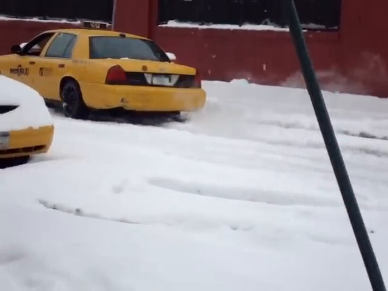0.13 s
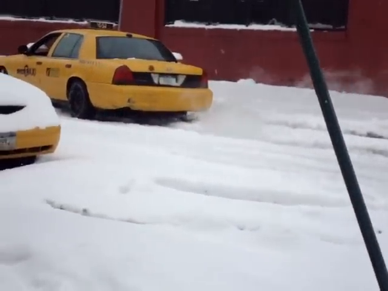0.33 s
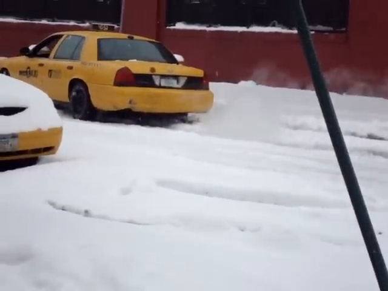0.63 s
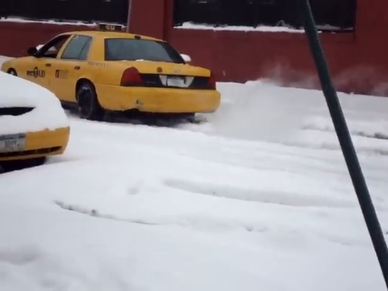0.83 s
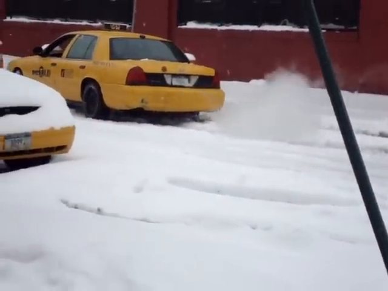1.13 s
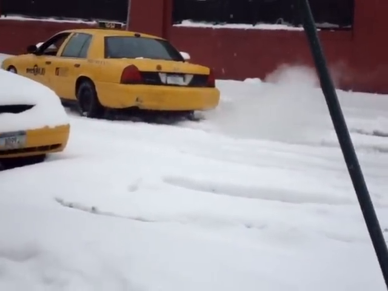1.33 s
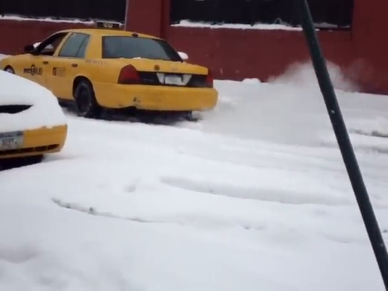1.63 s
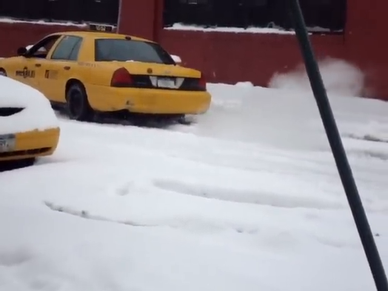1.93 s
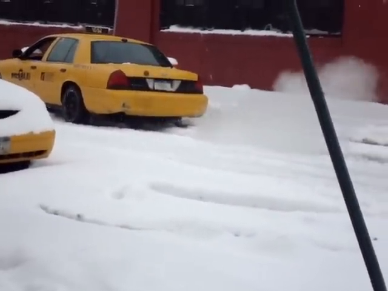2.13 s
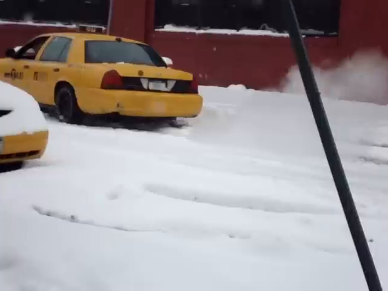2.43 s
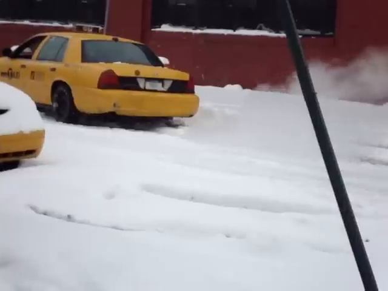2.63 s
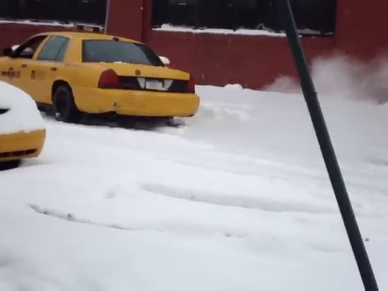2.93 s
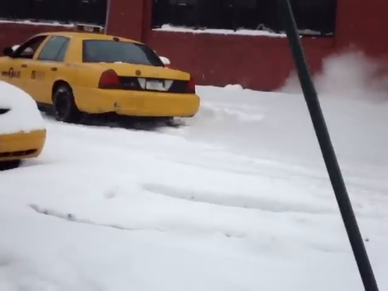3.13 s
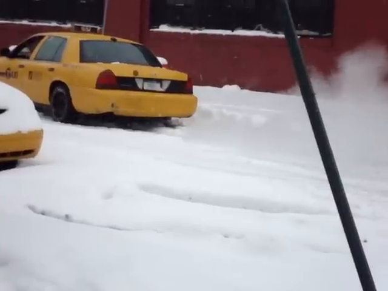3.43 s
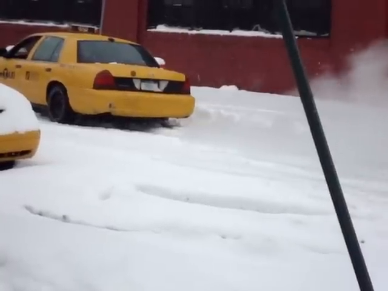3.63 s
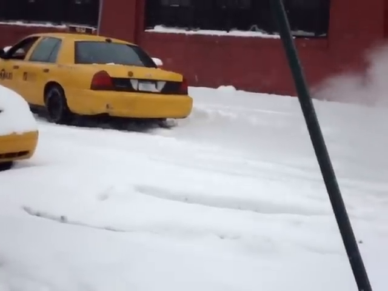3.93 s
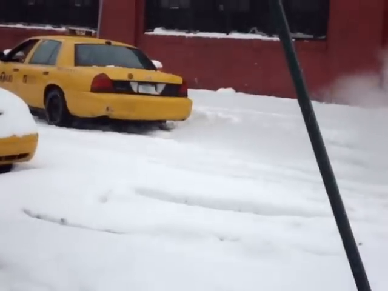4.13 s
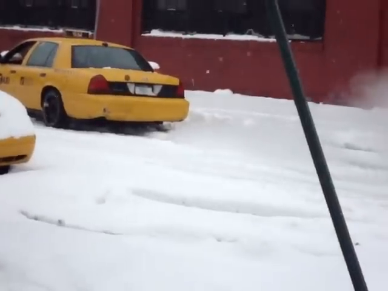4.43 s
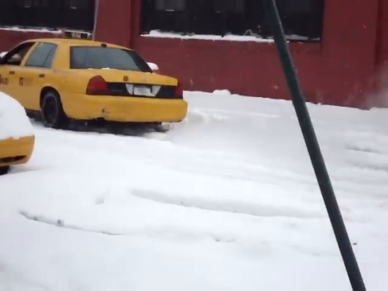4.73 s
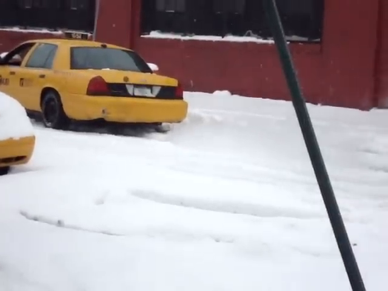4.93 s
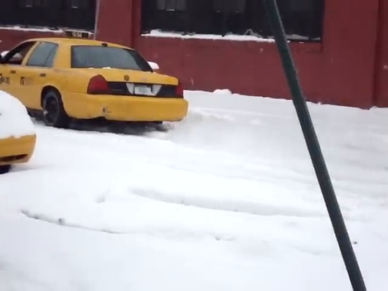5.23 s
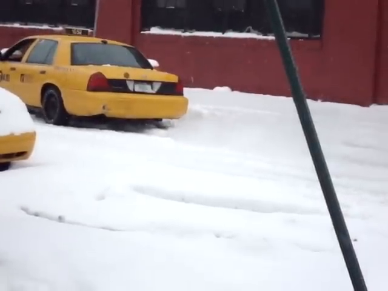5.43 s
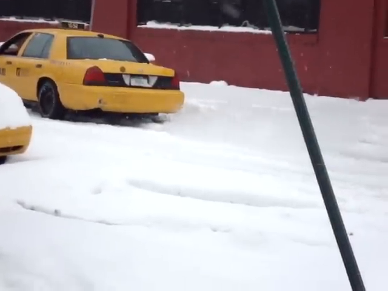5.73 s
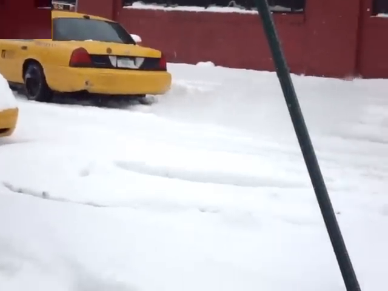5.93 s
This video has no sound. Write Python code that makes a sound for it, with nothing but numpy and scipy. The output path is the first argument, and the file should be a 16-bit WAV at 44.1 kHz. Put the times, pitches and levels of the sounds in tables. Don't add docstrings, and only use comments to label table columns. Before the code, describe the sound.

A car stuck in deep snow spins its rear wheels, tyres whining up and down in fuzzy tones as the engine revs, over muffled city traffic.

```python
import sys
import numpy as np
from scipy import signal
from scipy.fft import rfft, irfft, next_fast_len
from scipy.io import wavfile
from scipy.ndimage import uniform_filter1d, map_coordinates

SR = 44100
rng = np.random.default_rng(int(sys.argv[2]) if len(sys.argv) > 2 else 0)


def voltage_ratio(level):
    return 10 ** (np.asarray(level, float) / 20)


def store_wav(level_fs):
    pcm = np.round(np.clip(np.atleast_2d(level_fs), -1, 1) * 32767)
    wavfile.write(sys.argv[1], SR, pcm.T.astype(np.int16))


N = 267775

# time_s, firing_hz, throttle_db
ENGINE_RUN = [(0, 61, -75), (.13, 75, -46.5), (.62, 160, -36), (.72, 165, -37.5), (.82, 168, -44),
              (1.35, 121, -50), (1.55, 148, -38.5), (2.2, 238, -29), (2.3, 244, -36), (2.4, 225, -38.5),
              (2.8, 165, -37), (3.05, 140, -41.5), (3.55, 121, -45), (3.85, 168, -42), (4.8, 166, -37.5),
              (5.4, 105, -44), (5.76, 70, -51), (6.07, 108, -38.5)]
# time_s, slow_tread_hz, slow_bite_db, fast_tread_hz, fast_bite_db
WHEEL_SLIP = [(.25, 710.2, -53, 1330, -65), (.55, 913, -34.5, 1700, -38), (.83, 1078, -28.5, 2050, -29.5),
              (1.37, 729.4, -40, 1220, -43), (1.6, 828.5, -35, 1400, -37.5), (2.3, 1299, -26, 2200, -25.5),
              (2.47, 1099, -28, 1950, -27.5), (2.95, 890.3, -31, 1530, -34.5), (3.45, 754, -36, 1400, -33),
              (3.8, 836.6, -29.5, 1490, -30.5), (4.1, 1011, -24, 1750, -26), (4.5, 1141, -23, 1950, -29),
              (4.95, 1040, -22.5, 1560, -27), (5.22, 716.3, -26, 1400, -33),
              (5.42, 603.3, -30.5, 1370, -46.5), (5.7, 600, -48, 1250, -58), (5.9, 755, -42, 1300, -54),
              (6.07, 946, -27.5, 1500, -45)]


def unit(x):
    return x / np.sqrt(np.mean(np.abs(x) ** 2) + 1e-20)


def curves(rows):
    times_s, *columns = np.transpose(rows)
    return [np.interp(np.arange(N) / SR, times_s, column) for column in columns]


def wobble(rate):
    knots = rng.standard_normal(int(N * rate / SR) + 4)
    return map_coordinates(knots, [np.arange(N) * rate / SR])


def coloured(x, points):
    size = next_fast_len(N + 8192)
    hz, db = np.transpose(points)
    log_hz = np.log(np.fft.rfftfreq(size, 1 / SR) + 1)
    gain = voltage_ratio(np.interp(log_hz, np.log(hz + 1), db))
    return irfft(rfft(x, size) * gain, size)[:N]


def rush(spectrum, patchy_db, size=12):
    noise = signal.stft(rng.standard_normal(N), nperseg=512)[2]
    patches = uniform_filter1d(rng.standard_normal(noise.shape), size=8, axis=0)
    patches = uniform_filter1d(patches, size=size, axis=1)
    patchy = signal.istft(noise * voltage_ratio(patchy_db * unit(patches)), nperseg=512)[1][:N]
    return unit(coloured(patchy, spectrum))


def turns(hz):
    return 2 * np.pi * np.cumsum(hz) / SR


def fuzzy(hz, width_hz, steady=0):
    pole = np.exp(-2 * np.pi * width_hz / SR)
    kicks = rng.standard_normal(N) + 1j * rng.standard_normal(N)
    drift = signal.lfilter([1], [1, -2 * pole, pole ** 2], kicks)
    carrier = np.exp(1j * turns(hz))
    return unit(np.real(drift / np.abs(drift) ** steady * carrier))


def swell(start_s, length_s):
    progress = np.clip((np.arange(N) / SR - start_s) / length_s, 0, 1)
    return np.sin(np.pi * progress) ** .6


def city():
    # pitch_hz, level_db (per Hz)
    hum = [(15, -61), (25, -29), (70, -12), (124, -12.5), (172, -4.5), (290, 0), (382, -2.5), (663, 2.5),
           (941, -1), (1300, -6), (1440, -6), (3200, -14.5), (5290, -26.5), (8500, -30.5), (9880, -30.5),
           (12800, -58), (21700, -120)]
    return voltage_ratio(-36 + 0.63 * wobble(1.8)) * rush(hum, patchy_db=0.7)


def drones():
    # start_s, length_s, pitch_hz, level_db, width_hz
    resonances = [(.3, .45, 172, -55, 6), (2.3, .8, 170, -55, 6), (3.72, .3, 170, -52, 5),
                  (4.1, .9, 158, -59, 9), (3.05, .45, 79, -55, 2), (1.9, 1.15, 298, -54, 8),
                  (4.1, 1.1, 322, -55, 6), (4.2, 1.65, 2920, -48.5, 70), (5.2, .35, 930, -34, 110),
                  (4.3, .75, 1062, -31, 30), (4.4, .55, 1775, -36, 40)]
    out = np.zeros(N)
    for start_s, length_s, hz, db, width_hz in resonances:
        out += voltage_ratio(db) * swell(start_s, length_s) * fuzzy(np.full(N, hz), width_hz, steady=.5)
    return out


def squeaks():
    # start_s, pitch_hz, level_db
    rubs = [(4.015, 6750, -46), (4.15, 7320, -51), (4.24, 7680, -48), (4.37, 8000, -49),
            (4.45, 8060, -46.5), (4.57, 8020, -48), (4.775, 7980, -49.5), (4.865, 7690, -50.5)]
    wheel_hz = curves(WHEEL_SLIP)[0]
    out = np.zeros(N)
    for start_s, hz, db in rubs:
        glide = wheel_hz / wheel_hz[round(start_s * SR)]
        squeak = fuzzy(hz * glide, width_hz=140, steady=.7)
        out += voltage_ratio(db + 1.5) * swell(start_s, length_s=.052) * squeak
    return out


def engine():
    # pitch_hz, level_db (per Hz)
    pipe = [(300, -19.5), (650, 7.5), (1000, 7), (2000, 1), (2700, 1.5), (3500, -3.5), (4300, -0.5),
            (5000, 0.3), (6700, -7), (7200, -17), (10400, -22.5)]
    hz, throttle_db = curves(ENGINE_RUN)
    full_coast_hz_per_s, coast_db = 36, -21
    coasting = np.clip(-np.gradient(hz) * SR / full_coast_hz_per_s, 0, 1)
    coasting = uniform_filter1d(coasting, size=2000)
    tone_db = -52 + .6 * (throttle_db + 41) + coast_db * coasting
    phase = turns(hz * (1 + .016 * wobble(20)))
    tone = voltage_ratio(tone_db + 3 * wobble(12)) * (np.sin(phase) + voltage_ratio(-14) * np.sin(2 * phase))
    puffs = 1 + 0.066 * np.cos(phase) + 0.18 * np.cos(phase / 2)
    rasp_db = throttle_db + 3.0 + 0.41 * wobble(10) + 0.43 * wobble(18)
    rasp = voltage_ratio(rasp_db) * unit(puffs * rush(pipe, patchy_db=1.1, size=6))
    return tone + rasp


def snow_spray():
    # pitch_hz, level_db (per Hz)
    hiss = [(1800, -38), (3000, -6.5), (5000, -2.5), (6800, -1), (7200, -4.5), (8200, -3), (9900, -12.5),
            (12000, -42.5)]
    lag_s = 0.12
    bite_db, throttle_db = curves(WHEEL_SLIP)[1], curves(ENGINE_RUN)[1]
    late_db = np.interp(np.arange(N) - lag_s * SR, np.arange(N), bite_db)
    spray_db = -47.5 + 0.53 * (late_db + 29.5) + 0.43 * (throttle_db + 40)
    return voltage_ratio(spray_db + 1.2 * wobble(12) + 1.3 * wobble(40)) * rush(hiss, patchy_db=1.8, size=3)


def tyres():
    # pitch_hz, level_db
    tyre_body = [(300, -11.5), (600, -5.5), (800, -3.5), (960, -5), (1060, -4.5), (1200, -5), (1500, -9),
                 (2150, -2.5), (2400, -10), (4000, -17), (9000, -49)]
    # pitch_hz, level_db (per Hz)
    rubber = [(250, -43), (500, -41), (680, -10), (900, -0.5), (1250, -3.8), (1700, -5), (2150, -8.5),
              (2400, -22), (4000, -22.5), (8000, -58)]
    # pitch_hz, level_db
    fast_radiation = [(1200, 3), (1500, 8), (1750, -2.5), (2000, -9.5), (2300, -8.5)]
    slow_hz, bite_db, fast_hz, fast_bite_db = curves(WHEEL_SLIP)
    slow_db = bite_db + 0.3 * np.minimum(slow_hz - 706, 0)
    fast_db = fast_bite_db + np.interp(fast_hz, *np.transpose(fast_radiation))
    wheel_turn = np.sin(turns(slow_hz / 115))
    grip_db = .6 * wheel_turn + 1.9 * wobble(130)
    slow_band = fuzzy(slow_hz, width_hz=95, steady=.45)
    slow_core = voltage_ratio(-8) * fuzzy(slow_hz, width_hz=30, steady=.6)
    slow = voltage_ratio(slow_db - .5) * (slow_band + slow_core)
    fast = voltage_ratio(fast_db) * fuzzy(fast_hz, width_hz=120, steady=.3)
    short_db = -4 + .015 * np.minimum(slow_hz - 1130, 0) + 1.8 * (bite_db + 23.5)
    short = voltage_ratio(slow_db + short_db) * fuzzy(1.22 * slow_hz, width_hz=100)
    scrub = voltage_ratio(bite_db - 3.5) * rush(rubber, patchy_db=.6)
    return voltage_ratio(grip_db) * (coloured(slow + short + fast, tyre_body) + scrub)


def scene():
    # delay_s, level_db
    reflections = [(0.0104, -19), (0.016, -19.5), (.031, -21)]
    car = drones() + squeaks() + engine() + snow_spray() + tyres()
    echoes = np.zeros(N)
    for delay_s, db in reflections:
        echoes += voltage_ratio(db) * np.pad(car, (round(delay_s * SR), 0))[:N]
    return (city() + car + echoes)[None]


def band_limit(x):
    return signal.sosfilt(signal.butter(12, 10030, fs=SR, output="sos"), x)


def record(dry):
    return band_limit(dry)


dry = scene()
out = record(dry)
store_wav(out)
```